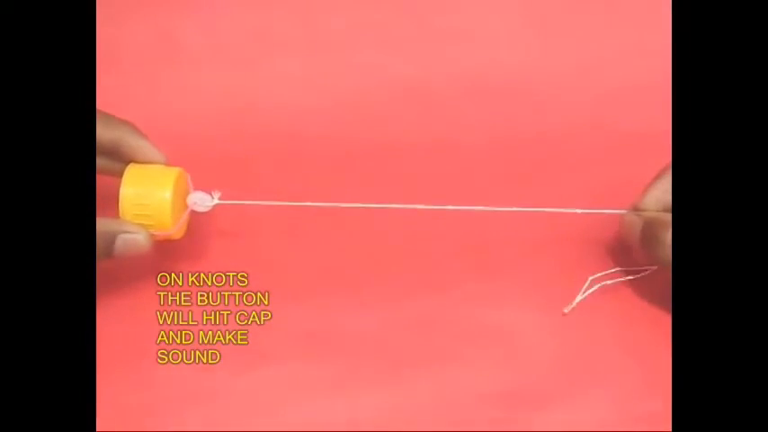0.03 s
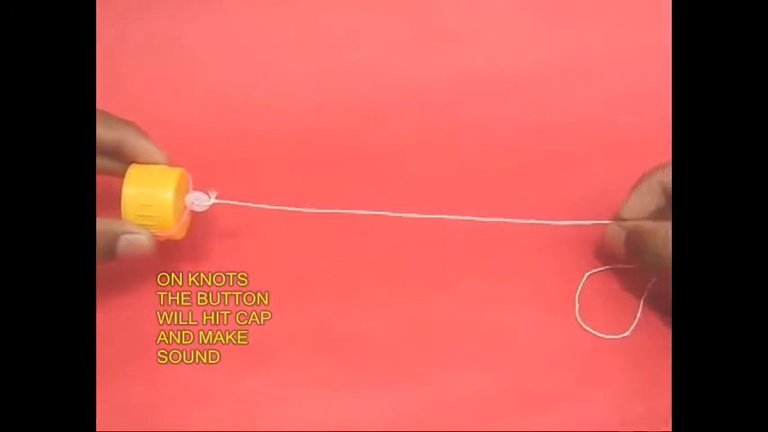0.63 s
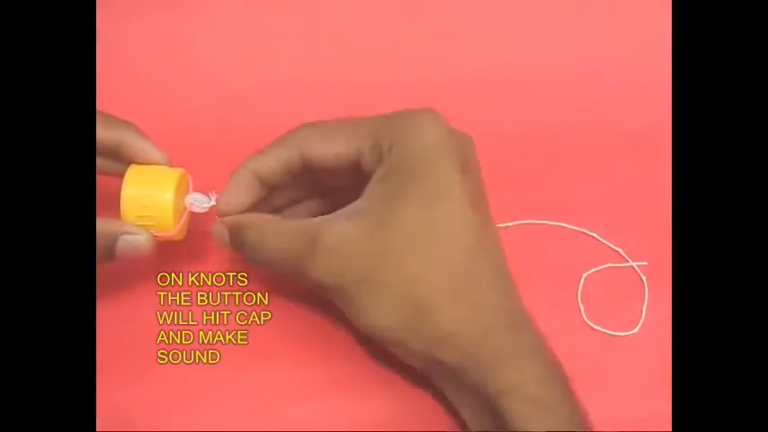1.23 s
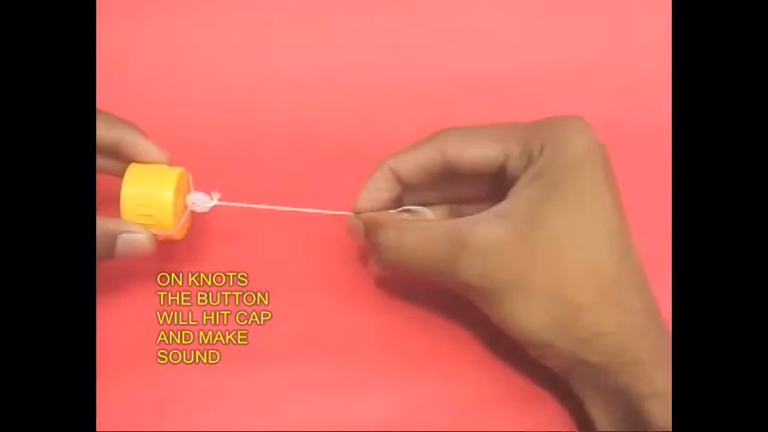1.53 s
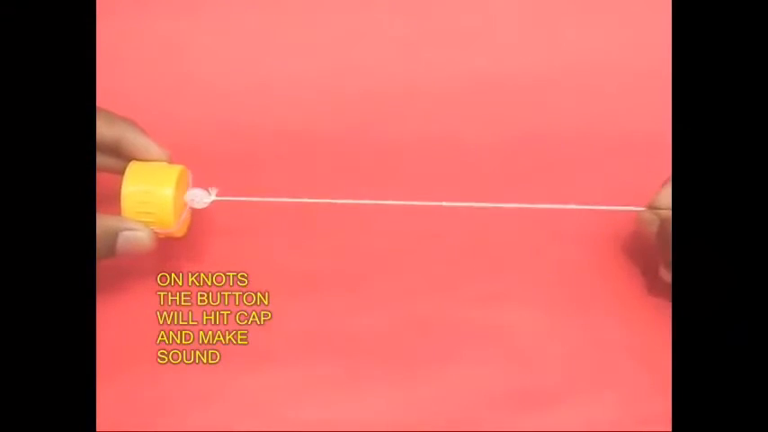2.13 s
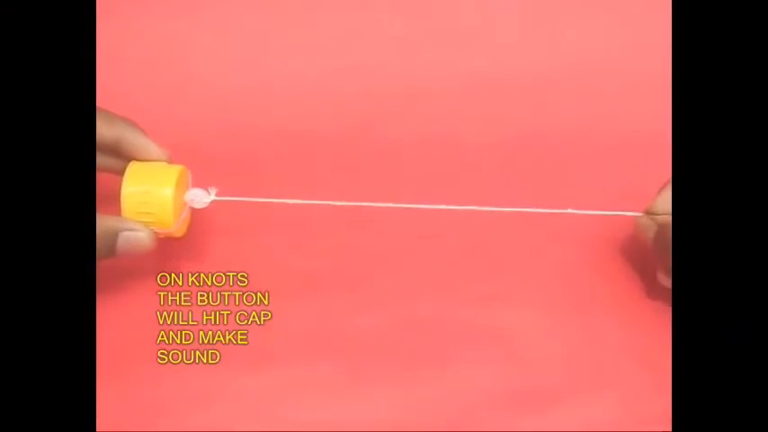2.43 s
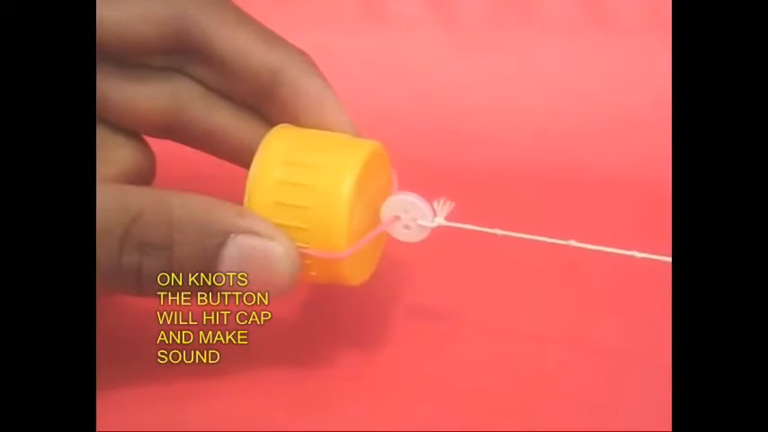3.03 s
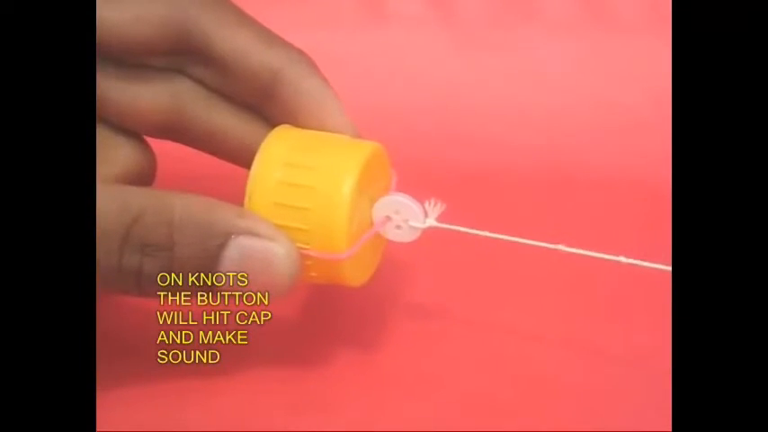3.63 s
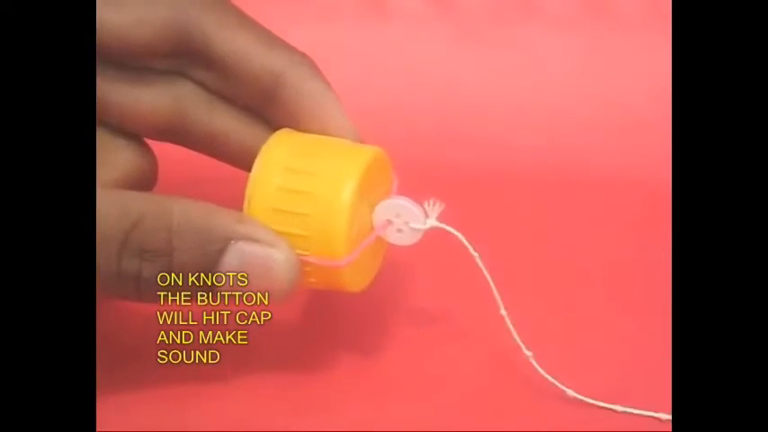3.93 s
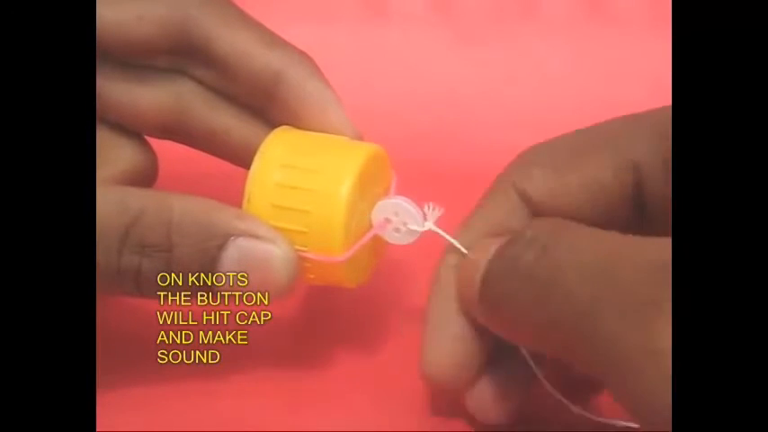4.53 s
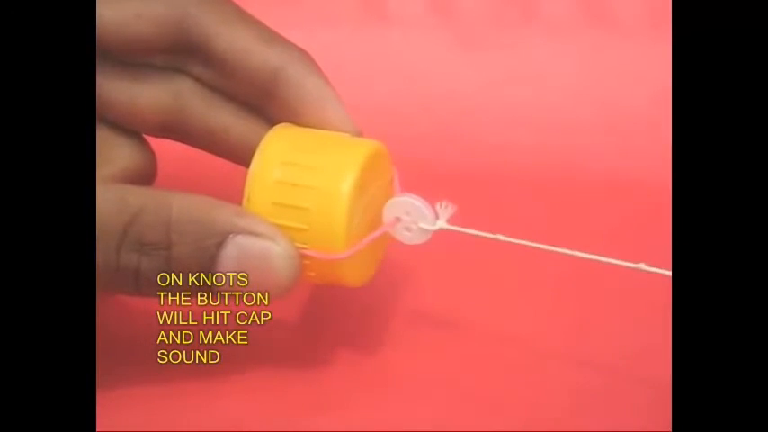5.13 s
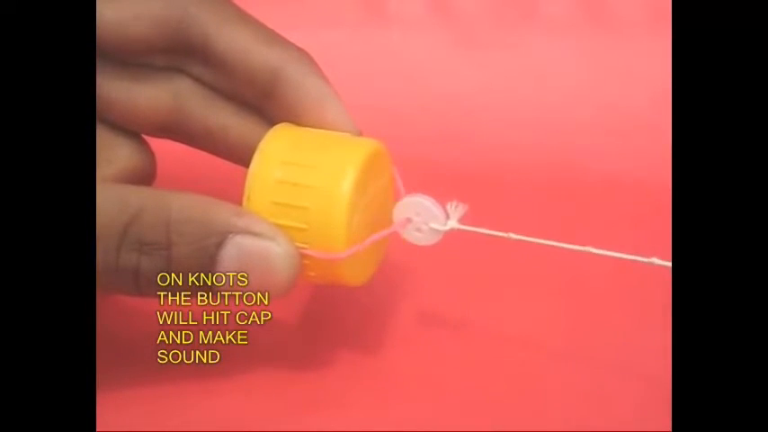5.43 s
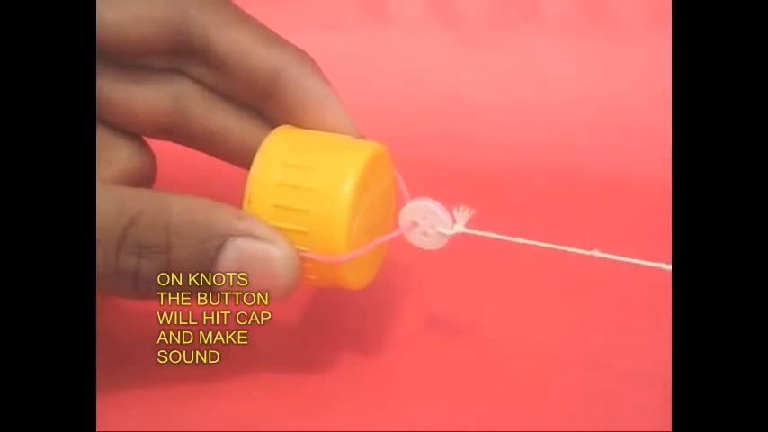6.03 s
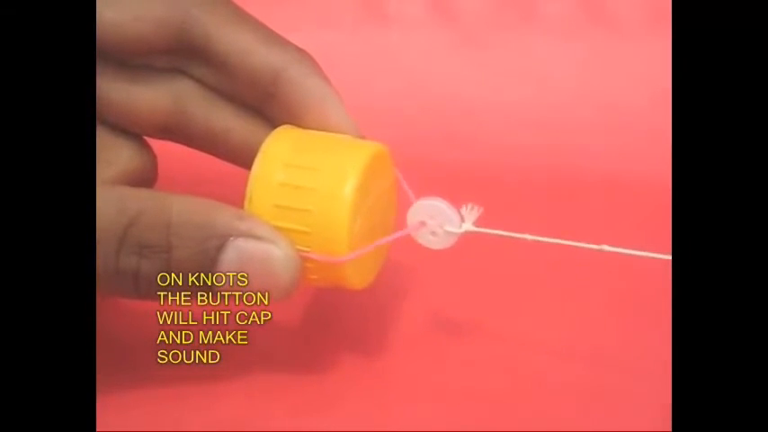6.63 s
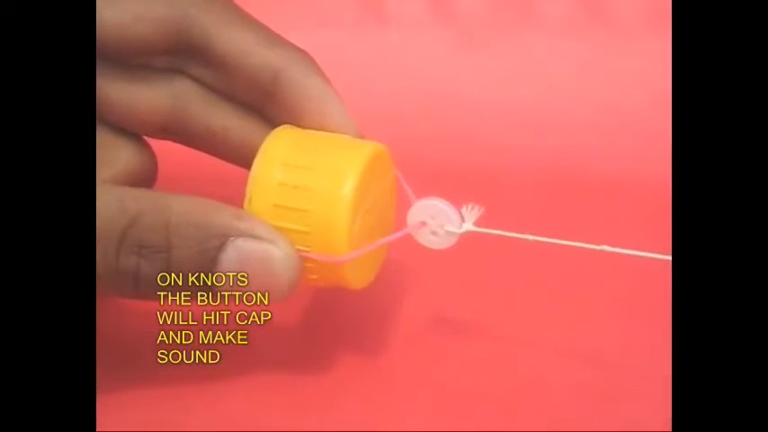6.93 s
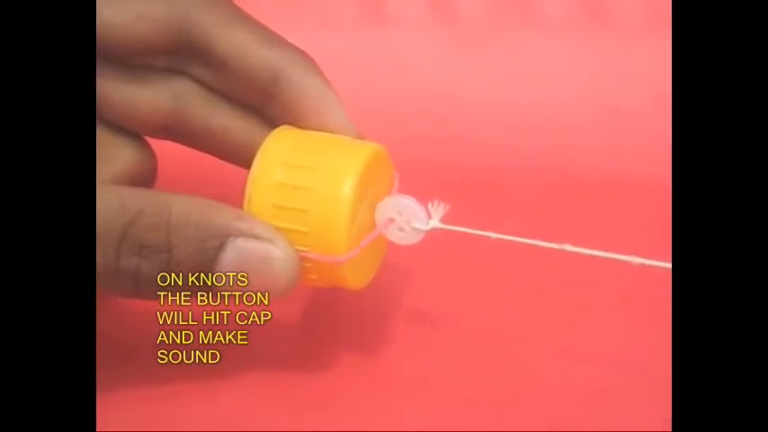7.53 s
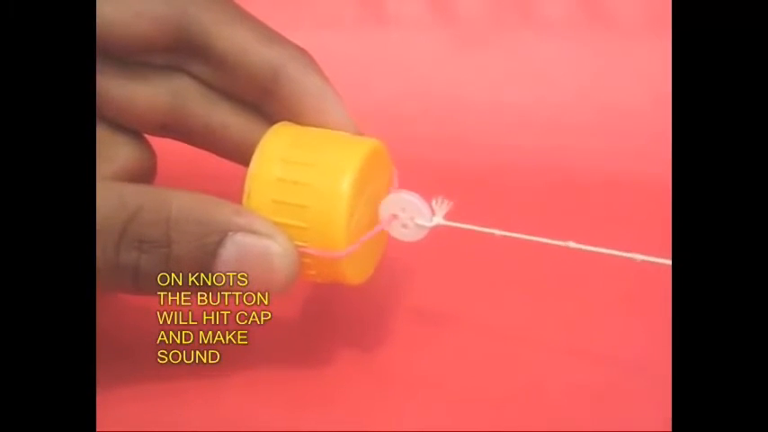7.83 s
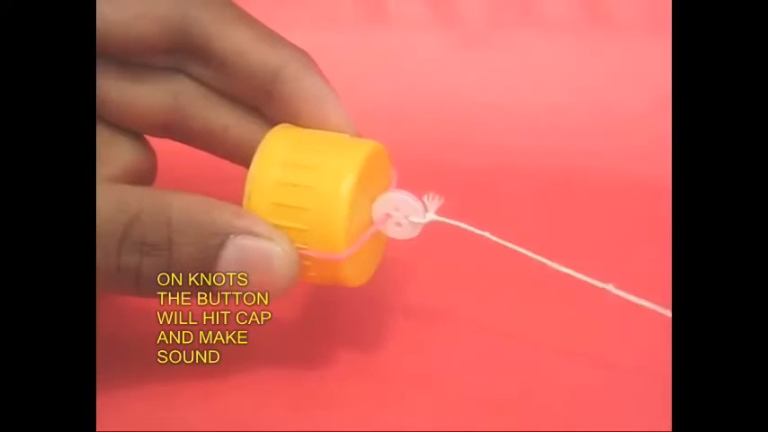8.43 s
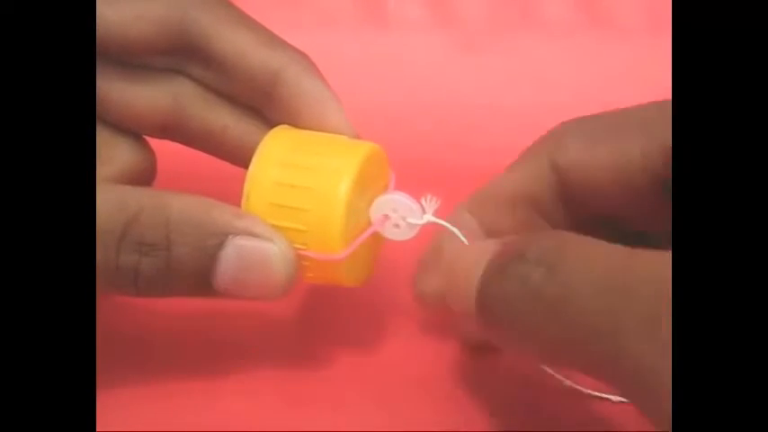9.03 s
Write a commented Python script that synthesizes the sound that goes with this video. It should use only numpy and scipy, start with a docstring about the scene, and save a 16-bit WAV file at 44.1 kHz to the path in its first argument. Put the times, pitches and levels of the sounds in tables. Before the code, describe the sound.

Bright, hard clicks rattle out in short irregular bursts, like a small ratchet, as a button strikes a plastic cap. Midway, fingers tap a table and string rubs faintly, then another fast run follows, with a low soft bump and a few last clicks. The microphone is very close and distorts a little on the hits; the small room has a faint hiss and hum.

```python
"""Sharp clicks come in ratchet-like runs and ring on in a small room, over faint air noise and hum.
A knotted string is pulled through the fingers; at each knot a button snaps back on its rubber band
and hits a plastic bottle cap. Between runs come deep soft bumps, the rub of the string and finger
taps on a table. The clicks overload a close microphone; a DC bias makes its right channel clip
lopsidedly, which adds a low thump."""
import sys
import numpy as np
from scipy import signal
from scipy.fft import rfft, irfft
from scipy.io import wavfile
from scipy.ndimage import uniform_filter1d

SR = 44100
rng = np.random.default_rng(int(sys.argv[2]) if len(sys.argv) > 2 else 0)


def put_to_file(sound):
    """Save the sound as 16-bit audio at rate SR, in the file named by the first command-line argument."""
    columns = np.atleast_2d(sound).T  # one column per channel
    safe = np.clip(columns, -1, 1)
    whole_steps = np.round(safe * 32767)
    wavfile.write(sys.argv[1], SR, whole_steps.astype(np.int16))


N = 410130

# impacts of button on cap: (time [s], blow level [dB], brightness [dB/octave])
CLICK_EVENTS = [(0.0098, 1.5, -0.5), (0.0257, 2.5, 7), (.0764, -1.5, -3.5), (0.1537, -9, -4),
                (0.321, -20.5, -4), (1.0133, 4, 1), (1.0787, 0.5, 3.5), (1.2967, 8, -2), (1.333, 0.5, -5),
                (1.362, -6.5, 0), (1.395, 3, 5), (1.4049, 4, -1.5), (1.4377, 1, -2), (1.4636, -10.5, -1),
                (1.4921, 5.5, 0), (1.5377, 5.5, -11), (1.5927, 2.5, -4.5), (1.7005, -7, -5.5),
                (2.5724, 5.5, -3), (2.593, 7, 1.5), (2.6066, 5.5, -5), (2.6179, 3.5, 3), (2.632, 2.5, 1),
                (2.6414, 4, 2.5), (3.432, 3.5, -1.5), (3.475, 6.5, 7), (3.4789, -3, -12), (3.5038, 3, -1),
                (3.5229, -8, -3), (3.5441, 7, -1.5), (3.56, -0.5, -4), (3.585, -12, -1),
                (3.6042, 6.5, -3.5), (3.615, -7, -2), (3.6341, 3, 0), (3.643, 4.5, -1.5), (3.6703, -5, -3),
                (3.6826, -7.5, 0), (3.7106, 3.5, -0.5), (3.7344, -3, 2.5), (3.8431, 8, 3),
                (3.9824, -14.5, 1), (4.914, -1, -4), (5.2036, -21.5, 3), (6.4668, 5.5, -6.5),
                (6.5338, 2, .5), (6.558, 2, -9), (6.58, 5.5, -2), (6.603, 4.5, -2.5), (6.6275, -3.5, -4),
                (6.649, 4.5, -5.5), (6.6726, 7.5, 0), (6.6939, 6, -3), (6.7358, 10.5, -0.5),
                (6.7413, -3, -9), (6.7745, 1, -5), (6.7775, 4, 5), (6.9063, 9.5, 1), (7.0375, -6.5, 0.5),
                (7.0546, -15.5, 1), (8.186, 0.5, -1.5), (8.2559, 0, 1), (8.514, -9, -2), (9.1988, 4.5, 0.5),
                (9.2348, 2.5, 3), (9.276, 2, -7), (9.2786, 0.5, -3)]
# spectrum of the crack, with two broad humps: (frequency [Hz], relative level [dB])
CRACK_SPECTRUM = [(300, -48.5), (1200, -30), (2300, -13), (2900, -1), (3400, 3), (4000, 3), (4450, -1.5),
                  (5000, 2), (5900, 3.5), (7000, -2.5), (8300, -15), (10300, -19), (12200, -16.5),
                  (15500, -25.5)]
# modes of the cap: (frequency [Hz], level [dB], t60 [s])
CAP_MODES = [(2945, -30, .016), (3290, -27, .016), (3620, -26, .016), (5846, -27, .010)]
# reflections from hand, table and wall: (delay [s], level [dB])
EARLY_ECHOES = [(.0015, -34), (.0029, -14), (0.015, -29)]
# reverberation time of the room: (frequency [Hz], t60 [s])
ROOM_T60 = [(300, 0.086), (1500, 0.19), (3300, 0.36), (6000, 0.28), (10000, 0.2), (15000, 0.2)]
# colour of the reverberation: (frequency [Hz], relative level [dB])
ROOM_SPECTRUM = [(300, 12), (2000, 6), (2900, 1), (3700, -2.5), (4500, -6), (7000, -2), (10000, 4.5),
                 (15000, 2.5)]
# still air in the room: (frequency [Hz], relative spectral density [dB])
AIR_SPECTRUM = [(12, -24.5), (33, -31), (60, -38), (100, -41), (180, -44.5), (300, -48.5), (400, -52),
                (650, -53.5), (1000, -56), (2000, -62), (4000, -65), (8000, -70), (13000, -71.5),
                (15500, -78)]
# left-right likeness of the air noise: (frequency [Hz], correlation [0-1])
AIR_CORRELATION = [(60, 0.92), (130, 0.91), (1400, 0.96), (3000, 0.34), (15000, 0.13)]
# steady hum in the room: (frequency [Hz], rms level [dB])
HUM_TONES = [(145, -59.5), (376, -66), (432, -68), (877.5, -68.5), (1593, -72.5)]
# thin electrical whine: (frequency [Hz], rms level [dB])
WHINE_TONES = [(3898, -68), (7800, -79)]
# deep soft bumps: (time [s], envelope peak [dB], frequency [Hz])
BUMP_EVENTS = [(.31, -39, 40.6), (4.715, -36, 45), (7.865, -25.5, 30.4), (7.925, -30, 32)]
# string sliding between the fingertips: (start [s], end [s], level [dB])
STRING_SLIDES = [(4.72, 5.14, -57), (7.88, 8.16, -66), (8.3, 8.472, -59)]
# fingers knocking and brushing on the table: (time [s], peak level [dB])
FINGER_TOUCHES = [(4.7243, -24), (4.731, -26), (4.791, -36.5), (4.877, -37), (4.956, -35), (4.989, -37),
                  (5.03, -36.5), (5.064, -40.5), (8.352, -38.5), (8.402, -39)]
# modes of the table top: (frequency [Hz], relative level [dB], t60 [s])
TABLE_MODES = [(388, -19, 0.04), (498, 7, 0.019), (740, 2, 0.012), (1050, 4.5, 0.013), (1420, 1.5, 0.016),
               (1800, -4.5, 0.019), (2200, -8.5, 0.039)]
# DC bias of the left and right channels: (offset [full scale])
DC_BIAS = [
    [-.027],
    [.314],
]


def amp(db):
    """Converts decibels to an amplitude ratio."""
    return 10 ** (np.asarray(db) / 20)


def unit_rms(x):
    """Normalises a signal to unit mean power."""
    return x / np.sqrt(np.mean(x ** 2) + 1e-20)


def curve_at(points, hz):
    """Interpolates a table on a log-frequency axis."""
    frequency, value = np.transpose(points)
    return np.interp(np.log(hz + 1), np.log(frequency), value)


def add(mix, start_s, sound):
    """Superposition: sums a sound into the mix from a given time."""
    part = mix[max(round(start_s * SR), 0):][:len(sound)]
    part += sound[:len(part)]


def band_pass(x, low_hz, high_hz, order=2):
    """Causal filtering attenuates frequencies outside the band."""
    return signal.sosfilt(signal.butter(order, [low_hz, high_hz], "band", fs=SR, output="sos"), x)


def minimum_phase(gain):
    """Minimum phase gives the most compact causal pulse with this magnitude spectrum."""
    size = 2 * (len(gain) - 1)
    log_gain = np.log(np.r_[gain, gain[-2:0:-1]] + 1e-5)
    return np.fft.ifft(np.exp(signal.hilbert(log_gain).conj())).real[:size // 2]


def cap_impact(bright_db, chatter_db=-15, chatter_t60=.009):
    """Impact excitation: a blow and the chatter of the button's rim make a crack; the cap's modes ring."""
    hz, t = np.fft.rfftfreq(2048, 1 / SR), np.arange(1024) / SR
    octaves = np.log2(np.clip(hz, 3000, 6000) / np.sqrt(3000 * 6000))
    tilt_db = np.clip(bright_db, -7, 7) * octaves
    crack = minimum_phase(amp(curve_at(CRACK_SPECTRUM, hz) + tilt_db))
    force = rng.standard_normal(len(t)) * amp(chatter_db - 60 * t / chatter_t60)
    force[0] = 1  # the blow itself
    mode_hz, db, t60 = np.transpose(CAP_MODES)[:, :, None]
    spot = np.cos(2 * np.pi * rng.random((len(CAP_MODES), 1)))  # the point of impact weights each mode
    ring = (spot * amp(db - 60 * t / t60) * np.sin(2 * np.pi * mode_hz * t)).sum(0)
    return 2 * np.convolve(force, crack / np.linalg.norm(crack))[:len(t)] + ring


def dull_thud(hz, t60=0.025, edge_ratio=1.72):
    """Damped band-limited noise: the short, dull low thud that comes with each click."""
    t = np.arange(2048) / SR
    burst = rng.standard_normal(len(t)) * amp(-60 * t / t60)
    thud = band_pass(burst, hz / edge_ratio, hz * edge_ratio, order=1)
    return thud / abs(thud).max()


def run_buildup(fade_s=0.093, scale_db=8):
    """Leaky integration of earlier clicks: 0 after a pause, towards 1 in a quick, loud run."""
    times, blow_db, _ = np.transpose(CLICK_EVENTS)
    elapsed = times[:, None] - times
    recent = ((elapsed > 0) * amp(blow_db) * np.exp(-abs(elapsed) / fade_s)).sum(1)
    return 1 - np.exp(-recent / amp(scale_db))


def button_clicks(level_db=-1, rebound_s=.0024, pause_hz=577, run_hz=106.3):
    """Inelastic collision: each knot lets the button hit the cap and rebound once, weaker."""
    out = np.zeros(N)
    scatter = rng.uniform(-1.1, 1, (len(CLICK_EVENTS), 4))
    for (start, blow_db, bright_db), buildup, chance in zip(CLICK_EVENTS, run_buildup(), scatter):
        late, lively, loud, high = chance
        hit_db = level_db + blow_db
        chatter_db = -15.5 + 0.3163 * blow_db  # a harder blow chatters more
        add(out, start, amp(hit_db) * cap_impact(bright_db, chatter_db))
        rebound_db = hit_db - 13 + 4 * lively
        add(out, start + rebound_s + .0009 * late, amp(rebound_db) * cap_impact(bright_db))
        # the thud is hollow after a pause, lower and stronger in quick runs
        thud_db = hit_db - 29.5 + 4 * buildup + 3 * loud
        thud_hz = pause_hz * (run_hz / pause_hz) ** buildup * 2 ** (0.52 * high)
        add(out, start, amp(thud_db) * dull_thud(thud_hz))
    return out


def room(x, wet_db=-11, build_s=0.00057):
    """Reverberation: near surfaces give single echoes, and a diffuse tail decays band by band."""
    t = np.arange(SR) / SR
    hz, frame_s, spectra = signal.stft(rng.standard_normal(SR), SR, nperseg=256)
    decay_db = 60 * frame_s / curve_at(ROOM_T60, hz)[:, None]
    spectra *= amp(curve_at(ROOM_SPECTRUM, hz)[:, None] - decay_db)
    tail = signal.istft(spectra, SR, nperseg=256)[1][:SR] * (1 - np.exp(-t / build_s))
    response = amp(wet_db) * tail / np.linalg.norm(tail)
    response[0] += 1  # direct sound
    for delay, db in EARLY_ECHOES:
        add(response, delay, amp([db]))
    return signal.fftconvolve(x, response)[:N]


def air(level_db=-42, flicker_db=3.0, flicker_hz=24, low_hz=700, high_hz=6500):
    """Partial coherence: the channels share rumble and some faint hiss, whose middle band flickers."""
    hz = np.fft.rfftfreq(N, 1 / SR)
    left, independent = rfft(rng.standard_normal((2, N)))
    correlation = curve_at(AIR_CORRELATION, hz)
    right = correlation * left + np.sqrt(1 - correlation ** 2) * independent
    spectra = np.array([left, right]) * amp(curve_at(AIR_SPECTRUM, hz))
    middle = hz ** 2 / (hz ** 2 + low_hz ** 2) / (1 + (hz / high_hz) ** 2)
    flicker = unit_rms(irfft(rfft(rng.standard_normal(N)) / (1 + (hz / flicker_hz) ** 2) ** 2, N))
    steady = irfft(spectra * (1 - middle), N)
    flickering = irfft(spectra * middle, N) * amp(flicker_db * flicker)
    return amp(level_db) * unit_rms(steady + flickering)


def hum(waver_hz=1.19):
    """Random frequency modulation: a low hum and a thin electrical whine waver slightly in pitch."""
    tones = HUM_TONES + WHINE_TONES
    wavers = unit_rms(uniform_filter1d(rng.standard_normal((len(tones), N)), size=3000))
    out = np.zeros(N)
    for (hz, db), waver in zip(tones, wavers):
        phase = 2 * np.pi * np.cumsum(hz + waver_hz * waver) / SR
        out += amp(db) * np.sqrt(2) * np.sin(phase)
    return out


def bumps(length_s=0.05):
    """Tone bursts near the lower limit of hearing: a couple of slow cycles, felt more than heard."""
    out, t = np.zeros(N), np.arange(0, length_s, 1 / SR)
    for start, db, hz in BUMP_EVENTS:
        add(out, start, -amp(db) * np.hanning(len(t)) * np.sin(2 * np.pi * hz * t))
    return out


def string_rub(slips_per_s=500):
    """Stick-slip friction: fibres catch and release on the skin in a faint, grainy rub."""
    out = np.zeros(N)
    strength = rng.exponential(1, N) * rng.standard_normal(N)
    slips = strength * (rng.random(N) < slips_per_s / SR)
    rub = band_pass(slips, low_hz=1500, high_hz=9000)
    for start, end, db in STRING_SLIDES:
        part = rub[round(start * SR):round(end * SR)]
        add(out, start, amp(db) * unit_rms(part) * signal.windows.tukey(len(part), .5))
    return out


def finger_taps(contact_s=0.0021, scuff_db=-12):
    """Modal resonance: soft contacts excite the table top's damped modes, with a little scuff of skin."""
    out, t = np.zeros(N), np.arange(SR // 10) / SR
    hz, db, t60 = np.transpose(TABLE_MODES)[:, :, None]
    table_ring = (amp(db - 60 * t / t60) * np.sin(2 * np.pi * hz * t)).sum(0)
    for start, peak_db in FINGER_TOUCHES:
        force = rng.standard_normal(len(t)) * np.exp(-t / contact_s)
        tap = signal.fftconvolve(force, table_ring)
        add(out, start, amp(peak_db) * tap / abs(tap).max())
        add(out, start, amp(peak_db + scuff_db) * band_pass(force, low_hz=800, high_hz=7000))
    return out


def scene():
    """Superposition: toy and fingers reach one point through the room, over bumps, air and hum."""
    return room(button_clicks() + finger_taps() + string_rub()) + bumps() + air() + hum()


def record(dry, ceiling=.47, knee=6.7, cutoff_hz=15900):
    """Asymmetric saturation: clipping a biased input partly rectifies it into bass; a low-pass follows."""
    bias = np.array(DC_BIAS)
    driven = dry + bias
    clipped = driven / (1 + abs(driven / ceiling) ** knee) ** (1 / knee)
    swing = clipped - np.median(clipped, axis=1, keepdims=True)
    low_pass = signal.firwin(255, cutoff_hz, window=("kaiser", 8), fs=SR)
    return bias + signal.oaconvolve(swing, low_pass[None], "same")


dry = scene()
out = record(dry)
put_to_file(out)
```